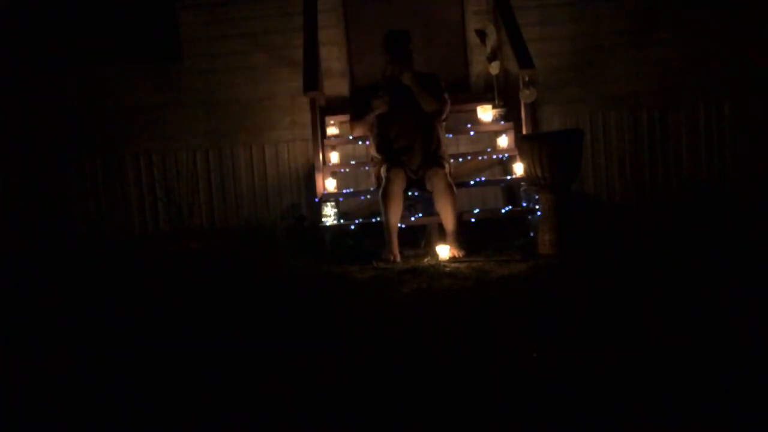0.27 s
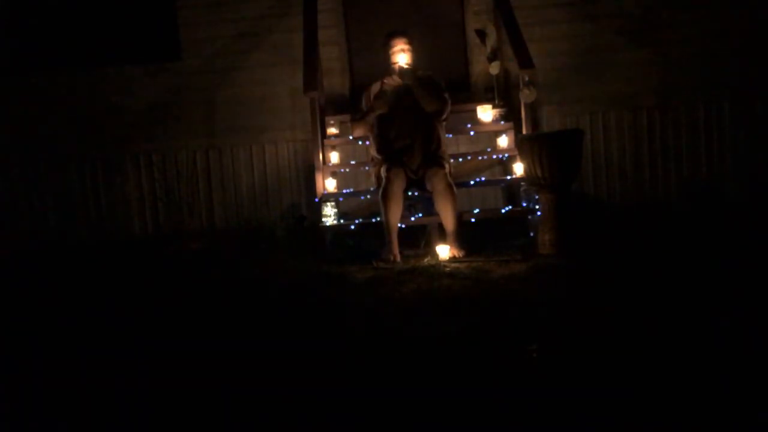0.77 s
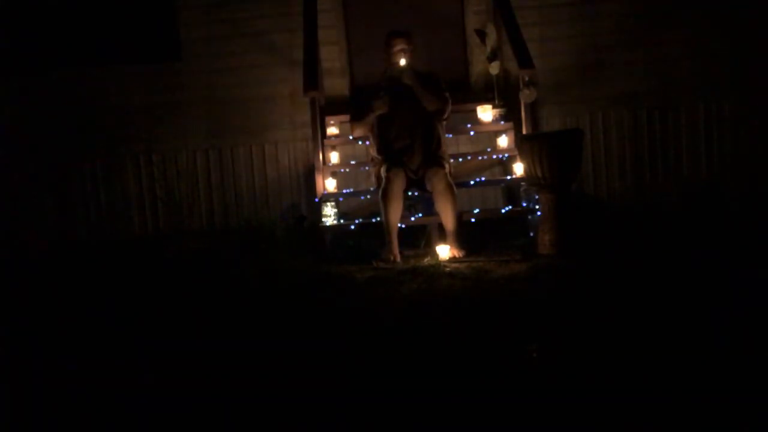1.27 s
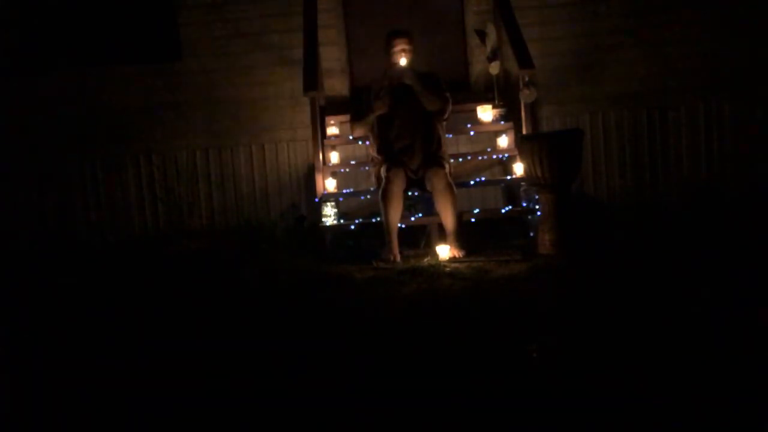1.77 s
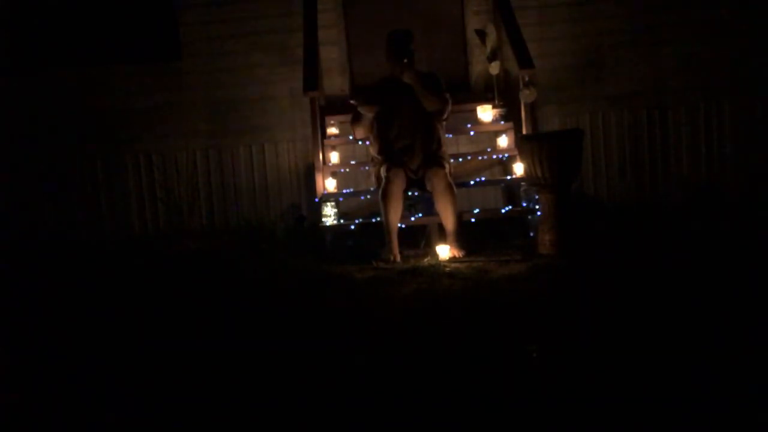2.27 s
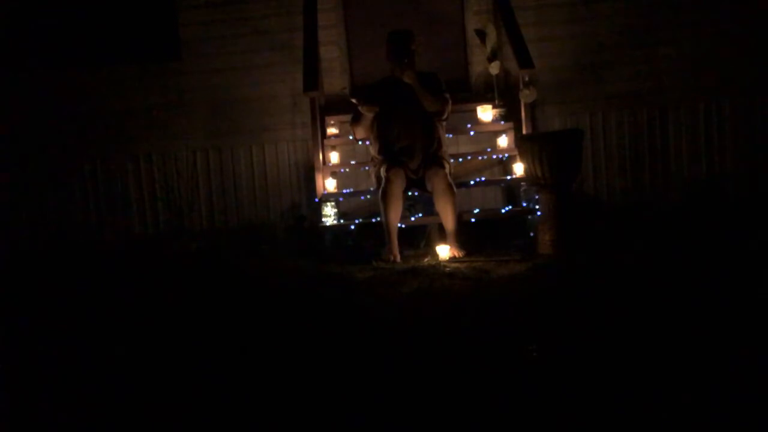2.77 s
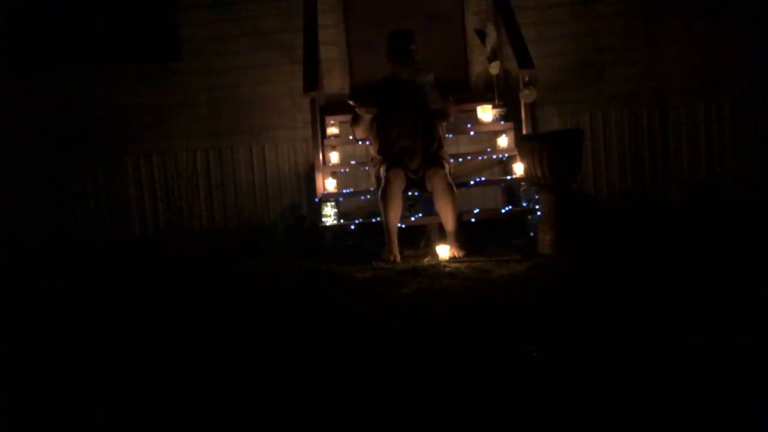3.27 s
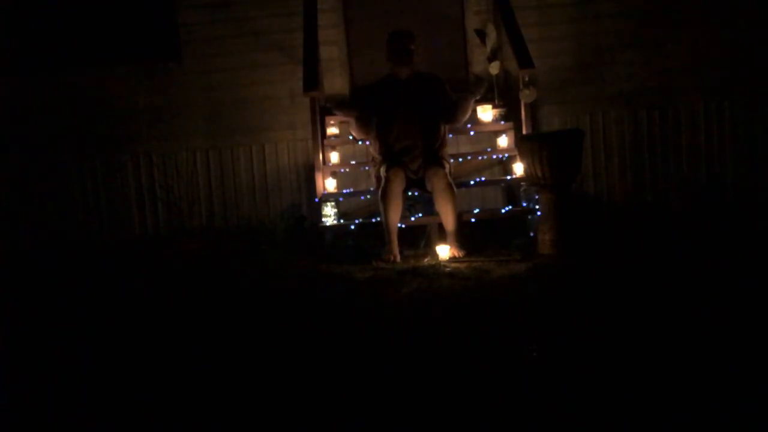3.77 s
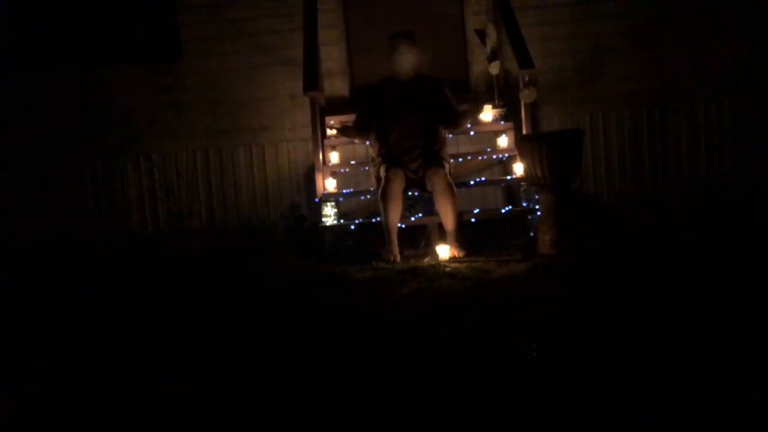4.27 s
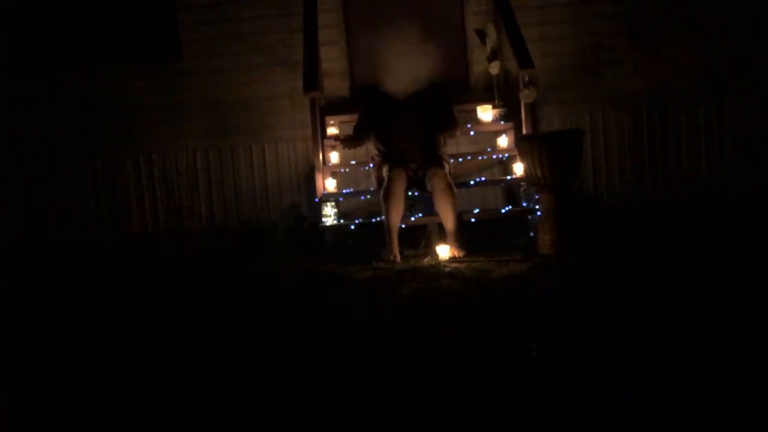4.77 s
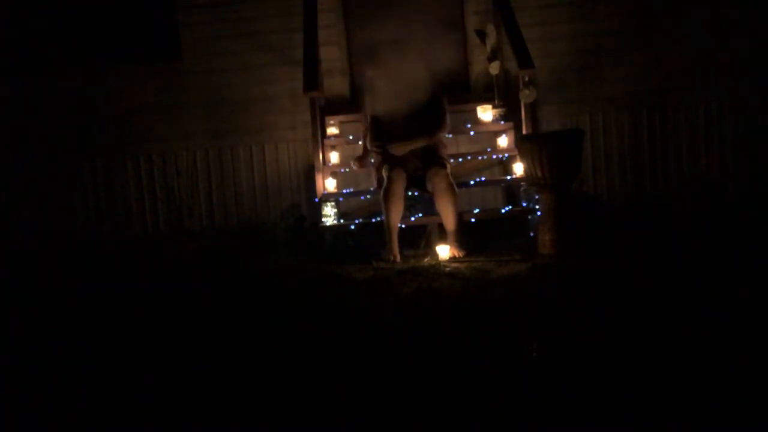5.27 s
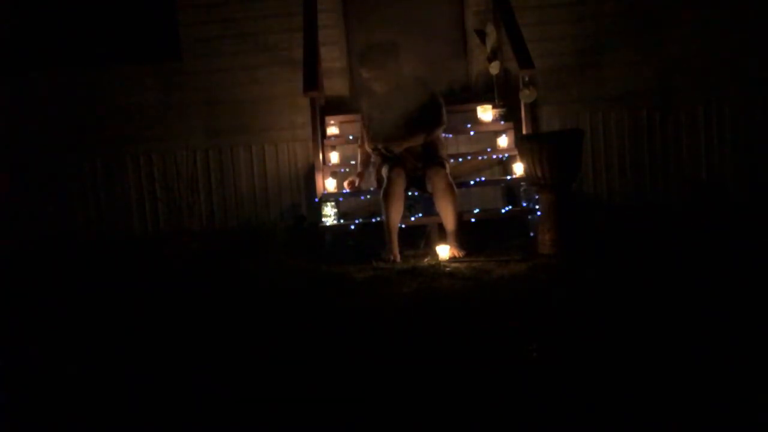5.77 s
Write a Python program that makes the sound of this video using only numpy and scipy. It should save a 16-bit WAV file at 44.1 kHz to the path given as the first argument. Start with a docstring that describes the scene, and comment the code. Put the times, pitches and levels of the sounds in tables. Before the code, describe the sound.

Loud, continuous insect chorus outdoors, raspy and bright, pulsing in fast waves. Under it lie a steady low hum, far traffic rumble and a faint rush of air. One sharp lighter snap comes early with a slight answer from the house wall, then a faint double click. A distant engine tone swells, dies away slightly lower, and returns near the end, when boards knock softly under shifting weight. Tiny hollow ticks are almost buried. Distant mono microphone.

```python
"""A yard at night: katydids and crickets rasp throughout, swelling together over two times a second under a thin sizzle.
Beneath them a machine hums, far traffic rumbles, night air rushes and small hollow ticks are nearly lost.
From the start an engine drones, strongest near 0.7-1 s; a lighter clicks on the porch at 0.5 s and twice near 1.9 s.
The drone fades, sinking in pitch, and returns from about 5 s; at 5.6 s someone shifts on the wooden steps.
Insects are tooth strikes, tone syllables and noise; clicks and knocks are struck modes with noise bursts; mono."""
import sys
import numpy as np
from scipy import signal
from scipy.fft import rfft, irfft, next_fast_len
from scipy.io import wavfile
from scipy.ndimage import map_coordinates

SR = 44100
rng = np.random.default_rng(int(sys.argv[2]) if len(sys.argv) > 2 else 0)


def log_audio(samples):
    """Write samples as a 16-bit WAV file to the path given in sys.argv[1]."""
    # one column per channel
    frames = np.atleast_2d(samples).T
    # limit to full scale, then quantise
    limited = np.clip(frames, -1, 1)
    pcm = np.round(limited * 32767).astype(np.int16)
    wavfile.write(sys.argv[1], SR, pcm)


N = 265261  # samples, about 6 s

# Lower wing resonance of the chorus: freq_hz [Hz], density_db [dB per Hz, relative]
RASP_SPECTRUM = [(950, -49.5), (1150, -25.5), (1350, -17), (1650, -15), (1930, -4), (2150, -1.5),
                 (2400, -6.5), (2650, 0.5), (2820, -3), (3020, 0.5), (3270, -0.5), (3600, -5.5),
                 (4000, -14.5), (4700, -39.5)]
# Upper wing resonance: freq_hz [Hz], density_db [dB per Hz, relative]
BRIGHT_SPECTRUM = [(3100, -35.5), (3700, -8.5), (4250, -1), (4570, 1), (4900, -4), (5250, -1.5), (5900, -6),
                   (6500, -20.5), (7200, -27.5), (8500, -39.5), (11000, -41)]
# High hiss over the chorus: freq_hz [Hz], density_db [dB per Hz, relative]
SIZZLE_SPECTRUM = [(6500, -30), (8800, -21), (10500, -10.5), (11200, -3), (13000, -1.5), (15700, 2.5),
                   (16500, -40)]
RASP_DB, BRIGHT_DB, SIZZLE_DB = -44.5, -45, -60.5  # layer level where the swelling gain is 1
RASP_BED, BRIGHT_BED, SIZZLE_BED = 1, 0.85, 0.78  # gain of the insects that never pause
SIZZLE_LEAD_S = 0.014  # the sizzle swells a little ahead of the rasp


def katydids():
    """Tooth strikes ring two wing resonances and scatter in the trees; the finest teeth blur into hiss."""
    *_, extra_bright_db, extra_sizzle_db = np.transpose(CHORUS_SWELLS)
    near_strikes = wing_strikes(tooth_hz=199.96, stroke_hz=20, scatter=0.5, count=11)
    far_strikes = wing_strikes(tooth_hz=260.6, stroke_hz=17, scatter=0.5, count=14)
    near = yard(near_strikes, wet_db=1.5)
    far = yard(far_strikes, wet_db=2.0)

    rasp = amp(RASP_DB) * swelling(RASP_BED) * coloured(near, RASP_SPECTRUM)
    bright_gain = amp(BRIGHT_DB) * swelling(BRIGHT_BED, extra_bright_db)
    bright = bright_gain * coloured(far + 0.53 * near, BRIGHT_SPECTRUM)
    hiss = flutter(rate=20, depth_db=0.8) * coloured(rng.standard_normal(N), SIZZLE_SPECTRUM)
    sizzle = amp(SIZZLE_DB) * swelling(SIZZLE_BED, extra_sizzle_db, SIZZLE_LEAD_S) * hiss
    return flutter(rate=49, depth_db=0.33) * (rasp + bright + sizzle)


def wing_strikes(tooth_hz, stroke_hz, scatter, count):
    """Each insect drags a scraper over its wing file: uneven tooth strikes, pressed hardest once a stroke."""
    strikes = np.zeros(N)
    for insect in range(count):
        speed, pace, start = rng.uniform(-1, 1, 3)  # each insect has its own tempo
        gaps_s = np.exp(0.5 * speed + scatter * rng.standard_normal(N // 20)) / tooth_hz
        strike_s = np.cumsum(gaps_s)
        strike_s = strike_s[strike_s < N / SR]
        stroke = start + stroke_hz * np.exp(0.3 * pace) * strike_s
        pressure = np.maximum(np.sin(2 * np.pi * stroke) + 1.13, 0)
        polarity = rng.choice([-1, 1], len(strike_s))
        strikes[(strike_s * SR).astype(int)] += polarity * pressure
    return strikes


# The waves in which the chorus sings: start_s [s], length_s [s, start to release],
# strength_db [dB], extra_bright_db [dB], extra_sizzle_db [dB]
CHORUS_SWELLS = [(-0.269, 0.29, 0.7, 4, 0), (0.2, 0.28, -1.2, -2.5, 3.1), (0.6, 0.257, 3, 0.8, -3),
                 (1.032, 0.347, -2.0, -1.5, 1.0), (1.447, 0.27, -0.2, 3, -0.5),
                 (1.842, 0.37, -0.2, -2.3, -0.4), (2.305, 0.29, -0.5, 2, -0.6), (2.747, 0.234, 0, 0.5, -2),
                 (3.044, 0.35, 0, -0.5, 1.1), (3.554, 0.309, 1.2, -1.5, -0.8),
                 (3.998, 0.28, 0.4, 2.5, -0.5), (4.433, 0.29, -2.0, -1.5, -0.2), (4.792, 0.33, 1, 1.5, 0.8),
                 (5.327, 0.288, 0.5, -3, -2), (5.721, 0.34, 0, 2.4, -3)]
ATTACK_S, RELEASE_S = 0.11, 0.17  # the insects join in, and drop out


def swelling(bed, extra_db=0, lead_s=0):
    """Gain of one layer of the chorus: each swell rises, holds and falls over a steady bed."""
    t = np.arange(N) / SR + lead_s
    gain = np.full(N, float(bed))
    starts, lengths, strength_db = np.transpose(CHORUS_SWELLS)[:3]
    for start, length, db in zip(starts, lengths, strength_db + extra_db):
        rise = (t - start) / ATTACK_S
        fall = 1 - (t - start - length) / RELEASE_S
        gain += amp(db) * np.clip(np.minimum(rise, fall), 0, 1)
    return gain


def crickets(pitch_hz, pitch_spread, syllable_s, below_db, count):
    """Short, nearly pure syllables from many crickets, swelling with the chorus."""
    track, t = np.zeros(N), np.arange(SR // 16) / SR
    starts = rng.uniform(0, N / SR, count)
    for s, (pitch, length, size) in zip(starts, rng.standard_normal((count, 3))):
        progress = np.minimum(t / (syllable_s * np.exp(0.4 * length)), 1)
        closing = 1 - 0.022 * (progress - 0.5)  # the wing slows as it closes
        hz = pitch_hz * np.exp(pitch_spread * pitch) * closing
        tone = np.sin(2 * np.pi * np.cumsum(hz) / SR)
        add(track, s, amp(1.8 * size) * np.sin(np.pi * progress) * tone)
    return amp(RASP_DB + below_db) * swelling(RASP_BED) * unit(track)


# Lighter clicks: start_s [s], snap_db [dB], ring_db [dB, relative]
LIGHTER_CLICKS = [(0.4882, -12.5, -27.5), (1.9032, -27, -30), (1.9400, -36, -58)]
# Modes of the small case: freq_hz [Hz], level_db [dB, relative], t60_s [s]
CASE_MODES = [(1000, -8.5, 0.014), (1200, -10, 0.018), (1510, -10, .018), (1850, 1, 0.02),
              (2800, -4, 0.0098), (3630, 5, .011), (6250, -8, 0.022), (7100, -28, .05), (8000, -26, .045)]
# Colour of the snap: freq_hz [Hz], gain_db [dB]
SNAP_COLOUR = [(300, -22), (720, -19), (1100, -3.5), (3500, 7.5), (6500, 0), (10000, -6), (15700, -10),
               (16500, -40)]


def lighter(wall_s=0.0097, wall_db=-22):
    """A sharp noise snap and the short ring of the small case; the house wall answers."""
    snaps, case, t = np.zeros(N), np.zeros(N), np.arange(SR // 8) / SR
    rise = 1 - np.exp(-t / 0.00048)
    for s, snap_db, ring_db in LIGHTER_CLICKS:
        snap_gain = amp(snap_db - 60 * t / 0.0074) * rise
        add(snaps, s, snap_gain * rng.standard_normal(len(t)))
        add(case, s, 0.64 * amp(ring_db) * rise * ring(CASE_MODES, t))
    clicks = case + filtered(snaps, lambda hz: amp(along(SNAP_COLOUR, hz)))
    wall_echo = amp(wall_db) * np.roll(clicks, round(wall_s * SR))
    return yard(clicks + wall_echo, wet_db=-16.5)


# Knocks on the steps: start_s [s], level_db [dB, relative], upper_db [dB, relative level of the upper modes]
STEP_KNOCKS = [(5.619, -45, -18), (5.676, -37.5, -10), (5.791, -50, -10), (5.909, -50, -25),
               (6.006, -49, -22)]
# Modes of the wooden boards: freq_hz [Hz], level_db [dB, relative], t60_s [s]
BOARD_MODES = [(347, -2.5, 0.14), (442, -6, 0.085), (489, 3.5, 0.063), (593, -5, 0.082), (672, -5, 0.075),
               (860, 2, 0.029), (946, -3, 0.061), (1160, -1, 0.028)]
# Colour of a foot's dull push: freq_hz [Hz], gain_db [dB]
THUD_COLOUR = [(200, -15), (350, 4), (600, 1), (1000, -4), (1400, -25), (2500, -60)]


def steps(thud_db=8, thud_t60=0.053):
    """Weight shifts on the boards: each knock rings their modes, with its own upper share, over a dull thud."""
    boards, pushes, t = np.zeros(N), np.zeros(N), np.arange(SR // 4) / SR
    rise = 1 - np.exp(-t / 0.00077)
    for s, db, upper_db in STEP_KNOCKS:
        modes = []
        for hz, level, t60 in BOARD_MODES:
            tilt_db = np.interp(hz, [550, 950], [0, upper_db + 11.5])
            modes.append((hz, level + tilt_db, t60))
        add(boards, s, amp(db - 7) * ring(modes, t) * rise)
        push_gain = amp(db + thud_db - 60 * t / thud_t60) * rise
        add(pushes, s, push_gain * rng.standard_normal(len(t)))
    thuds = filtered(pushes, lambda hz: amp(along(THUD_COLOUR, hz)))
    return yard(boards + thuds, wet_db=-16)


# Faint ticks around the yard: start_s [s], level_db [dB, relative]
HOLLOW_TICKS = [(0.242, -59), (1.177, -61), (1.715, -55), (1.759, -62), (3.166, -62), (3.648, -60),
                (4.871, -55.5), (5.209, -59)]
# Modes of a tick: freq_hz [Hz], level_db [dB, relative], t60_s [s]
HOLLOW_MODES = [(970, -2, 0.044), (1140, -2, 0.05), (1210, 14, 0.016)]


def ticks():
    """Small hollow ticks of three damped modes, nearly lost in the chorus."""
    track, t = np.zeros(N), np.arange(SR // 8) / SR
    rise = 1 - np.exp(-t / 0.00058)
    for s, db in HOLLOW_TICKS:
        add(track, s, amp(db - 1.5) * ring(HOLLOW_MODES, t) * rise)
    return yard(track, wet_db=-20)


# Engine drone, the first harmonic: time_s [s], level_db [dB]
DRONE_LEVEL = [(0.0, -59.5), (0.3, -58.2), (0.7, -49), (1.05, -49.3), (1.35, -63), (1.9, -53.5),
               (3.7, -68.5), (4.9, -70), (5.3, -54.5), (6.01, -58.5)]
# Engine whine, an octave up: time_s [s], level_db [dB]
WHINE_LEVEL = [(0.0, -85.4), (1.1, -78), (1.4, -71), (2.15, -71), (2.5, -74), (3.8, -79.5), (4.05, -70),
               (4.9, -69.2), (5.15, -58.5), (6.01, -70)]
ENGINE_HZ, SAG_FROM_S, SAG_HZ_PER_S = 140.2, 1.6, 1.35  # holds its pitch, then slowly sinks


def engine():
    """The first two harmonics of a far engine fade in and out as its pitch sinks."""
    sag_s = np.maximum(np.arange(N) / SR - SAG_FROM_S, 0)
    hz = ENGINE_HZ - SAG_HZ_PER_S * sag_s
    low = drone(hz, curves(DRONE_LEVEL)[0], waver_db=0.8)
    whine = drone(2 * hz, curves(WHINE_LEVEL)[0], waver_db=2)
    return low + whine


def drone(hz, db, waver_db):
    """A far tone whose level wavers on its way through the air."""
    phase = 2 * np.pi * np.cumsum(hz * np.ones(N)) / SR
    return amp(db) * flutter(rate=9.7, depth_db=waver_db) * unit(np.sin(phase))


# Far traffic: time_s [s], rumble_db [dB], tyre_roar_db [dB]
TRAFFIC_LEVEL = [(0.0, -56.5, -62.5), (1.25, -49.5, -57.5), (1.75, -55.5, -57.5), (2.1, -51.5, -60.5),
                 (2.8, -56, -65.5), (3.25, -53, -62.5), (4.1, -55.5, -67.5), (4.9, -55.5, -58.9),
                 (5.5, -49.5, -57), (6.01, -57.4, -60.5)]
# Traffic rumble: freq_hz [Hz], density_db [dB per Hz, relative]
RUMBLE_SPECTRUM = [(25, -34), (36, -1), (48, -5), (78, 5), (97, -2.5), (118, 1), (140, -2), (175, -18),
                   (300, -43.5)]
# Tyre roar: freq_hz [Hz], density_db [dB per Hz, relative]
ROAR_SPECTRUM = [(110, -26), (155, 4), (176, -7.5), (195, -1), (214, -12), (232, -3.5), (252, -11),
                 (330, -20.5), (600, -46.5)]
# Rush of the night air: freq_hz [Hz], density_db [dB per Hz, relative]
AIR_SPECTRUM = [(100, -20), (350, -1.5), (480, 0), (750, -3.5), (1000, -6), (3000, 10), (9000, -18)]
HUM_HZ, HUM_DB = 58.7, -52


def background():
    """A machine hum of one tone, coloured noise for far traffic and the faint rush of air, and the engine."""
    rumble_db, roar_db = curves(TRAFFIC_LEVEL)
    hum = drone(HUM_HZ, HUM_DB, waver_db=0.9)
    rumble = amp(rumble_db) * coloured(rng.standard_normal(N), RUMBLE_SPECTRUM)
    roar = amp(roar_db) * coloured(rng.standard_normal(N), ROAR_SPECTRUM)
    air = amp(-59.5) * coloured(rng.standard_normal(N), AIR_SPECTRUM)
    return hum + rumble + roar + air + engine()


def yard(x, wet_db, size=900):
    """x and its scatter; every size samples the sound comes by other paths."""
    wet = np.zeros(N)
    for start in range(0, N, size):
        piece = x[start:start + size]
        if piece.any():
            add(wet, start / SR, signal.fftconvolve(piece, tail()))
    return x + amp(wet_db) * wet


# Decay of the yard's scatter: freq_hz [Hz], t60_s [s]
TREES_DECAY = [(300, 0.21), (3000, 0.41), (12000, 0.24)]


def tail():
    """One random scatter from trees and house wall: noise that decays at its own pace in each band."""
    hz, t, bands = signal.stft(rng.standard_normal(SR // 4), SR, nperseg=256)
    decay = amp(-60 * t / along(TREES_DECAY, hz)[:, None])
    echo = signal.istft(bands * decay, SR, nperseg=256)[1]
    return echo / np.linalg.norm(echo)


def ring(modes, t):
    """Damped modes, struck at slightly new strengths each time."""
    total = np.zeros(len(t))
    for hz, db, t60 in modes:
        strength = rng.choice([-1, 1]) * amp(db + rng.normal(0, 1) - 60 * t / t60)
        total += strength * np.sin(2 * np.pi * hz * t)
    return total


def flutter(rate, depth_db):
    """Gain that wavers at random, with rate knots a second."""
    return amp(depth_db * wobble(rate))


def wobble(rate):
    """A smooth random curve, rate knots a second."""
    knots = rng.standard_normal(256)
    coarse = map_coordinates(knots, [np.linspace(0, rate * N / SR, 2048)], mode="wrap")
    return np.interp(np.linspace(0, 1, N), np.linspace(0, 1, len(coarse)), coarse)


def coloured(x, spectrum):
    """x through a (Hz, dB) spectrum, at rms 1."""
    return unit(filtered(x, lambda hz: amp(along(spectrum, hz))))


def filtered(x, response):
    """x times a response of frequency."""
    m = next_fast_len(N + SR // 2)
    return irfft(rfft(x, m) * response(np.fft.rfftfreq(m, 1 / SR)), m)[:N]


def along(points, hz):
    """(Hz, value) points read on a log axis."""
    f, v = np.transpose(points)
    return np.interp(np.log(hz + 1), np.log(f + 1), v)


def curves(rows):
    """One value per sample for each column after the time."""
    s, *cols = np.transpose(rows)
    return [np.interp(np.arange(N) / SR, s, c) for c in cols]


def add(track, s, sound):
    """Mix a sound into the track at s seconds."""
    part = track[round(s * SR):][:len(sound)]
    part += sound[:len(part)]


def amp(db):
    """Decibels to gain."""
    return 10 ** (np.asarray(db) / 20)


def unit(x):
    """Scale to rms 1."""
    return x / np.sqrt(np.mean(x ** 2) + 1e-20)


def scene():
    """All sources, alike in both channels."""
    low_crickets = crickets(pitch_hz=3076, pitch_spread=0.0514, syllable_s=0.015, below_db=-6.5, count=700)
    high_crickets = crickets(pitch_hz=4535, pitch_spread=0.0247, syllable_s=0.011, below_db=-16, count=500)
    insects = katydids() + low_crickets + high_crickets
    mono = insects + lighter() + steps() + ticks() + background()
    return np.array([mono, mono])


TOP_HZ = 15750


def record(dry):
    """Nothing at or above the band limit is kept."""
    return np.array([filtered(channel, lambda hz: hz < TOP_HZ) for channel in dry])


dry = scene()
out = record(dry)
log_audio(out)
```